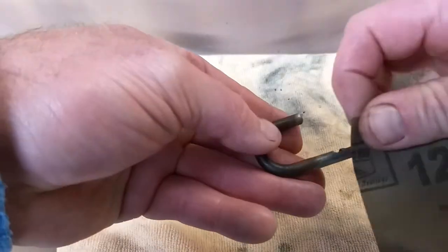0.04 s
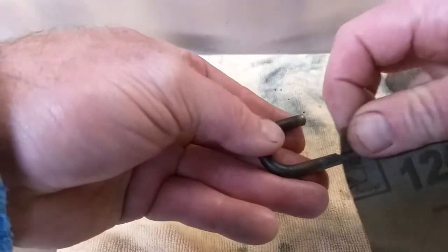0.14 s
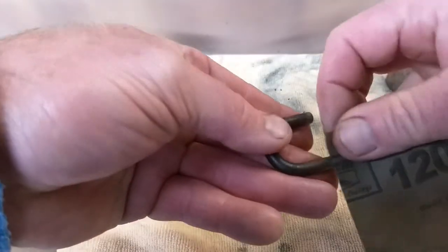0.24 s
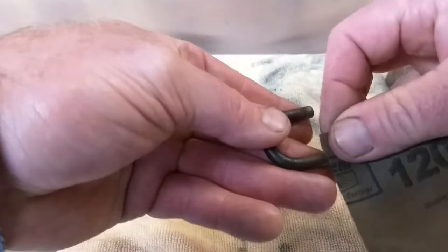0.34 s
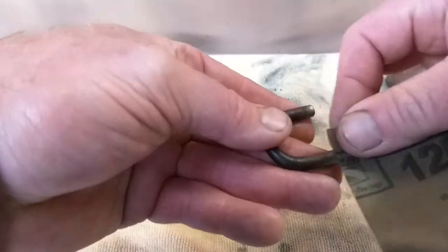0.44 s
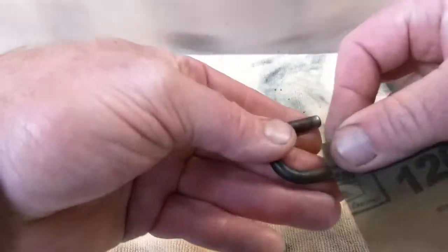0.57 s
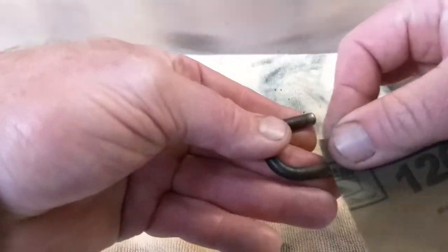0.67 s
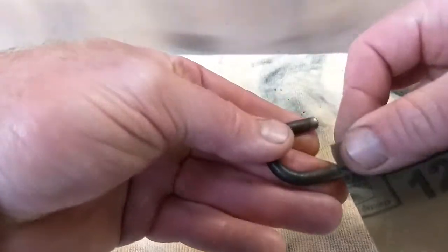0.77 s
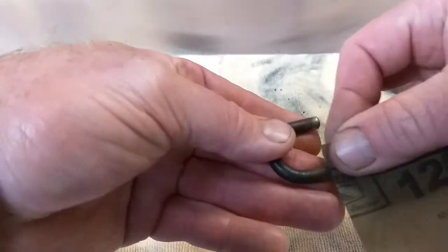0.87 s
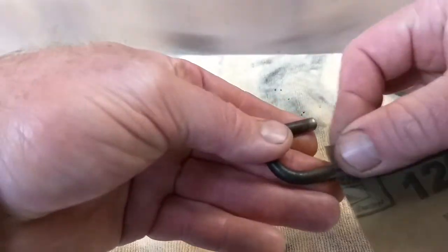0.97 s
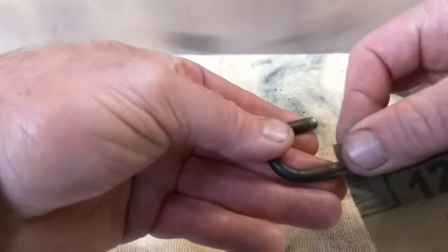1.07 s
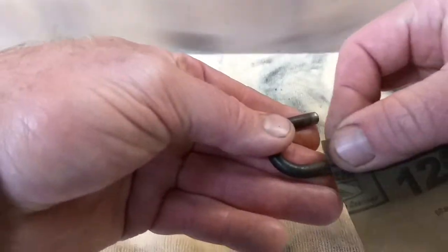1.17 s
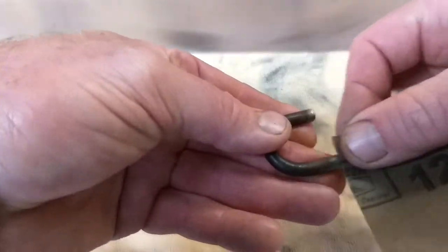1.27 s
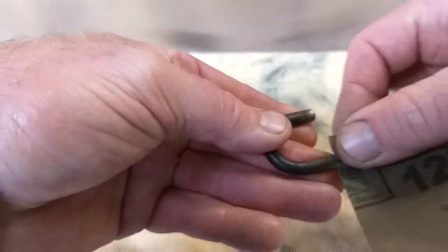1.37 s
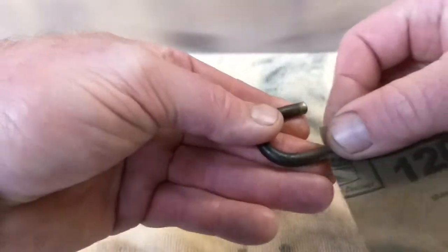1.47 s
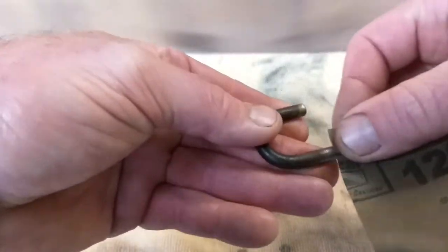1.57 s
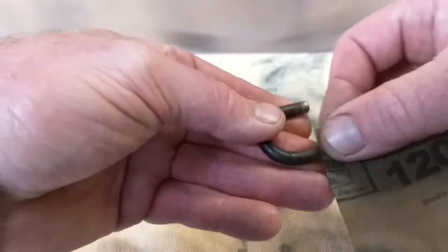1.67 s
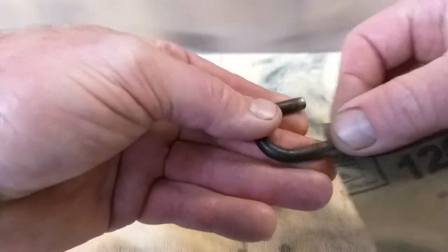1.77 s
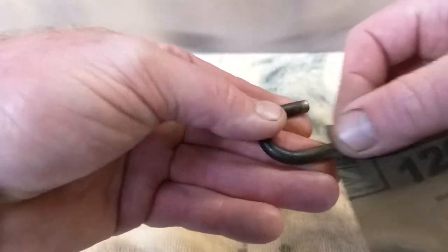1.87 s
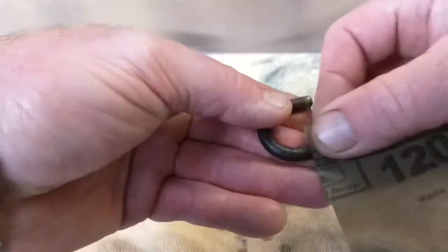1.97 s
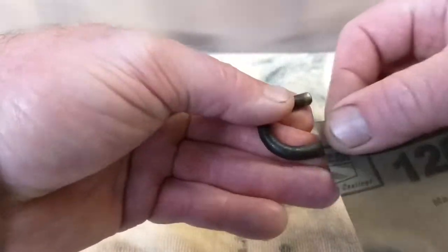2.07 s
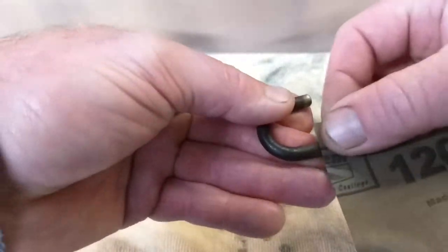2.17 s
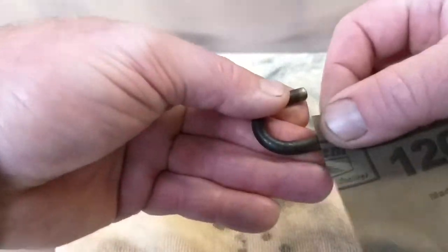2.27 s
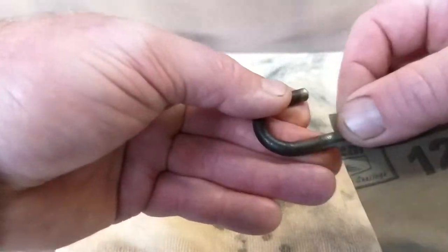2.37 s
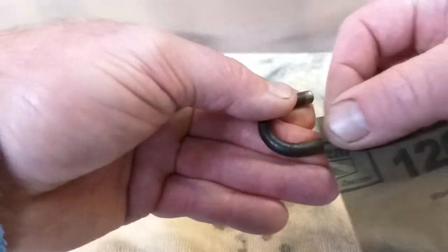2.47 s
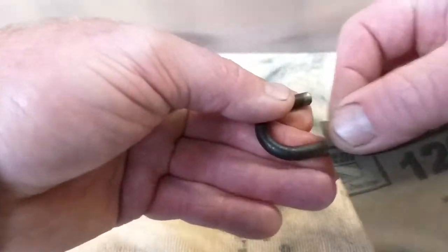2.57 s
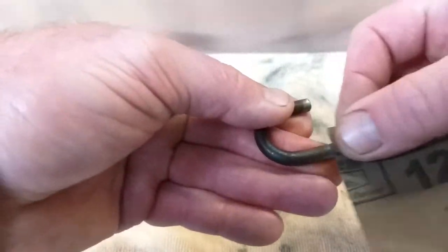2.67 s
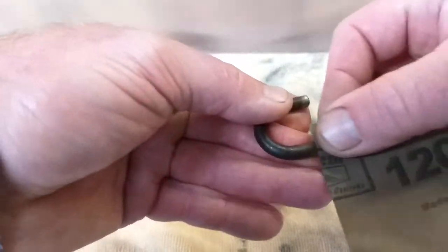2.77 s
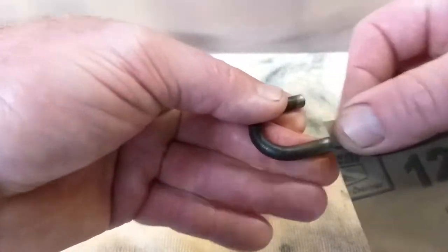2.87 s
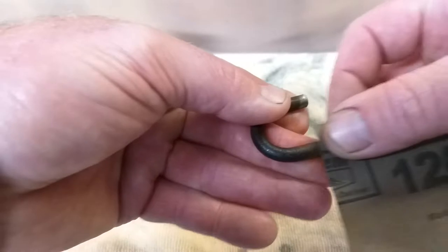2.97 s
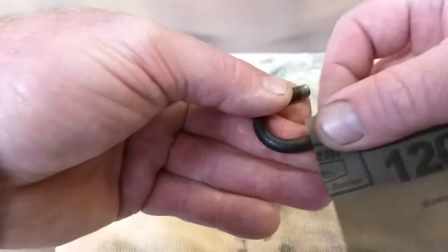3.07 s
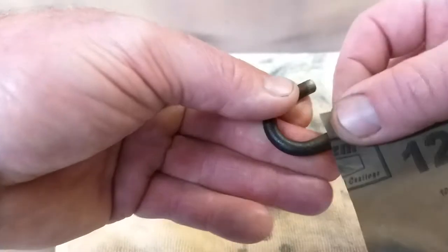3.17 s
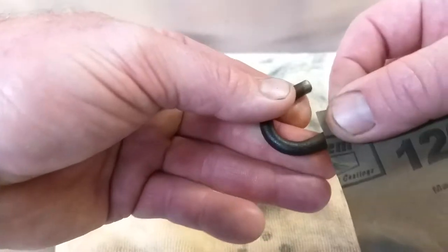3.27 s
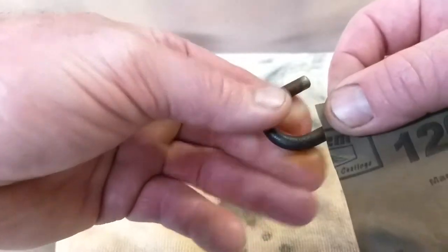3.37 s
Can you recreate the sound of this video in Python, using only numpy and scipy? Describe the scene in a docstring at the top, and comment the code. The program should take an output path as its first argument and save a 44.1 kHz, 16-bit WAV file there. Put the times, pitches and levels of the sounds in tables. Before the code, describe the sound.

Sandpaper rubbed quickly back and forth over a small steel part by hand.

```python
"""In a workshop, close to a phone, abrasive paper is rubbed back and forth over a small steel shackle.
Grit clicks densely on the steel, growing quieter and duller at each turn; the grip colours
every stroke. A quick cluster of dull knocks rings the bench at the start, and paper ticks and light
drags fill the pauses. Underneath lie a short room tail and a faint workshop hum."""
import sys
import numpy as np
from scipy import signal
from scipy.fft import rfft, irfft
from scipy.io import wavfile
from scipy.ndimage import uniform_filter1d

SR = 44100
rng = np.random.default_rng(int(sys.argv[2]) if len(sys.argv) > 2 else 0)


def dump(signal):
    """Clip the signal to [-1, 1] and save it as 16-bit WAV at the path in sys.argv[1]."""
    limited = np.clip(np.atleast_2d(signal).T, -1, 1)
    pcm = np.round(limited * 32767).astype(np.int16)
    wavfile.write(sys.argv[1], SR, pcm)


N = 152145

# Strokes and light drags; the second row is the low, dull tail of the opening knocks.
# Each row: start and end in seconds, place of the crest from 0 to 1, dip at the start and at the end
# (in dB once scaled by BODY_DIP or TREBLE_DIP), level at the crest in dB, then a gain in dB for each
# grip band, low to high.
STROKES = [(0.0, 0.01, 0.48, 0.0, 2, -39, 23, -10, 15.5, 7, 4, -1, 15),
           (0.017, 0.093, 0.1, 7, -3, -65, 35, 11, 12.5, -3, -10, -6, -11),
           (0.207, 0.289, 0.83, 8, 23, -29, 2.5, 6, 1.5, -2.5, -5, 1, -6),
           (0.309, 0.36, 0.57, 24, 22.0, -27, 9.5, 2, 6, 5.5, 0, -1.5, 3),
           (0.375, 0.468, 0.5, 25, 31, -31, 5.5, 3.5, 3, -1.5, -5, -1, -5.5),
           (0.489, 0.618, 0.57, 23.5, 2.5, -27, 0.5, 1.5, 2.5, -2, -5, 1, -4),
           (0.632, 0.755, 0.63, 36, 14, -26, -1, 7, 3, -3, -6, -3, -7),
           (0.771, 0.818, 0.99, 11, 0.0, -49, 5, 1, 4, 4, -1, 1, -10),
           (0.809, 0.906, 0.29, 22, 8.5, -26.5, 0.5, 1.5, 7.5, -1, 0.5, 1.5, 1.5),
           (0.934, 1.044, 0.41, 34, 5.5, -25, 0.5, 1.5, 2, -1, -2, -2.5, -2.5),
           (1.076, 1.182, 0.34, 37, 7.5, -26, -3, 0, 2, -2, -2, -0.5, -1),
           (1.207, 1.313, 0.51, 20, 7, -25.5, -3, -2, 0, 0, 0.5, -4, -2),
           (1.34, 1.429, 0.31, 37, 8, -28, -4, -1.5, 1.5, -1.5, 3, -1.5, -0.5),
           (1.444, 1.563, 0.75, 31.5, 20, -26, 2, -5.5, 3, -1, 1.5, -3.5, -0.5),
           (1.588, 1.699, 0.28, 27, 8, -25, -5.5, 1.5, -1, 0, 0.5, -3.5, -1),
           (1.721, 1.832, 0.65, 24.5, 14, -25, 0.5, -1.5, 0.5, -1.5, 0.5, -5, -2.5),
           (1.854, 1.963, 0.19, 32, 7, -22, -2.5, -1.5, 0, -1, -0.5, -1.5, 1),
           (1.985, 2.088, 0.51, 26, 16, -29, 9, 4.5, 5.5, 1, 1, -2.5, -0.5),
           (2.086, 2.147, 0.71, 14, 13, -57, 19, 1, 1, -2, 3, -15, -9),
           (2.152, 2.199, 0.089, -6, 17, -60.5, 4, 5, 6, 0, 3, -4, -3),
           (2.263, 2.375, 0.5, 16, 4.5, -30, 8, 2.5, 5, -0.5, -2, -5.5, -2),
           (2.403, 2.516, 0.22, 26.0, 6.5, -26, -0.5, 1, 1.5, -2, -1.5, -1, -4.5),
           (2.541, 2.64, 0.34, 26.5, 3, -26, 6, 3, 6, -0.5, -1, -3.5, -1.5),
           (2.664, 2.775, 0.22, 28, 8.5, -26, -1.5, 3.5, 3.5, -0.5, -0.5, -2.5, -0.5),
           (2.793, 2.911, 0.58, 24.5, 6, -26.5, 3.5, 7, 0, -0.5, -7.5, -5, -7.5),
           (2.933, 3.046, 0.22, 22, 8.5, -27, 10, 0.5, 9, 1.5, -3, 3, 0),
           (3.064, 3.144, 0.78, 26, 11, -37, 7, 4.5, 6, -2.5, -3, -4.5, -9.5),
           (3.142, 3.214, 0.76, 14.5, 15.0, -35.5, 9, 3, 4, 6, 0.5, 3, 0.5),
           (3.222, 3.273, 0.55, 5, 8.0, -67, 9, -3, 1, 0, -6, -1, -5),
           (3.287, 3.331, 0.81, 16, 15, -44.5, 13, -2, -1.5, 3.5, -1, 6, 2),
           (3.342, 3.349, 0.41, 6.0, 11.0, -48, 5, -4, 7, 2, 9, 11, 3),
           (3.349, 3.376, 0.51, -1, 11.0, -57.5, 5, 1, 2, -1, 7, 8, 1),
           (3.38, 3.422, 0.1, 5, 17, -65, 5, 7, -2, -2, 10, -3, 3),
           (3.433, 3.52, 0.27, 18, 6.0, -29.5, -1, 7.5, -4, -3, 1, 3.5, -5)]
# Resonances of paper and steel that the grip frees or damps. Each row: centre in Hz, width in octaves.
GRIP_BANDS = [(550, 0.83), (1100, 0.41), (2400, 0.62), (4500, 0.27), (5800, 0.057), (7400, 0.13),
              (14000, 0.6)]
# The tone of grit on steel. Each row: frequency in Hz, gain in dB.
GRIT_EQ = [(150, -53.5), (250, -38.5), (399, -34), (564, -30), (855, -31), (949, -29), (1090, -26),
           (1190, -21.5), (1440, -19.5), (1960, -12), (2500, -15), (2980, -7.5), (3480, -12.5),
           (4070, -2.5), (4510, 0.5), (5090, -1.5), (5750, 2), (7080, -0.5), (7720, 2.5), (9180, 3),
           (10500, -2.5), (11300, -3), (15700, -12)]
# Resonances that every grit click excites. Each row: centre in Hz, width in Hz, boost in dB.
STEEL_RINGS = [(2020, 346, 2), (2910, 370, 0.5), (5750, 250, 2.5), (8840, 1500, 0.3)]
# Paper ticks. Each row: start in seconds, peak level in dB before the band-pass.
PAPER_TICKS = [(0.206, -20), (0.6379, -28), (0.7831, -35), (0.9374, -25), (1.728, -28), (1.7385, -24),
               (2.132, -28), (2.156, -38), (2.2464, -63), (2.2538, -59), (2.2913, -17), (2.3424, -11),
               (3.2174, -29), (3.297, -32), (3.3633, -39), (3.37, -33), (3.3767, -44)]
# Knocks on the bench. Each row: start in seconds, peak level in dB, brightness in dB per octave.
BENCH_KNOCKS = [(0.0119, -20.5, 4.5), (0.0232, -23.5, 3.7), (0.028, -25, -2), (0.07, -45.5, -6),
                (0.141, -60, -6), (0.2047, -48.5, -3.5), (3.144, -42, 0.5)]
# Modes of the bench. Each row: pitch in Hz, relative level in dB, seconds to fade by 60 dB.
BENCH_MODES = [(260, 8, 0.022), (356, -0.5, 0.026), (456, -1, 0.027), (710, 7, 0.015), (1170, 2, 0.0096),
               (1410, 2.5, 0.0063), (2010, 2, 0.016), (2750, -10, 0.0094), (3800, -3, 0.0044)]
# Workshop hum. Each row: pitch in Hz, RMS level in dB, width in Hz.
HUM_BANDS = [(53, -89, 7.2), (108, -74, 9.8)]
# The tone of the workshop air. Each row: frequency in Hz, gain in dB.
AIR_EQ = [(20, -36), (45, -6.5), (140, -10), (320, -22), (400, -23), (800, -24), (1400, -30), (4500, -27),
          (8500, -35), (15500, -43)]
# Bands where the two microphone ports differ, leaning left then right.
# Each row: centre in Hz, width in Hz, side gain in dB, phase shift in radians.
PORT_BANDS = [(1920, 320, -13.5, 0.84), (9630, 920, -11.5, .9)]

GRAINS_PER_S, GRAIN_SPREAD_DB, GRAIN_CAP_DB = 15000, 3, 6.5
FLUTTER_DB, FLUTTER_PER_S = 0.94, 160
RISE_POWER, FALL_POWER, CATCH_S, STOP_S = 2.93, 4.14, 0.0016, 0.0036
CROSSOVER_HZ, BODY_DIP, TREBLE_DIP = 7000, 0.98, 2.22  # slow parts of a stroke lose more treble
CREEP_DB, CREEP_S = -43, 0.028
TICK_T60_S, TICK_LOW_HZ, TICK_HIGH_HZ = 0.0043, 4000, 15000
CONTACT_S = 0.00022
ROOM_DB, ROOM_T60_S = -17.5, 0.13
AIR_DB, AMBIENCE_SIDE_DB = -71, -29
MIC_HISS_DB, MIC_HISS_HZ, LOW_CUT_HZ, HIGH_CUT_HZ = -77.5, 4000, 48, 15920


def sanding():
    """Thousands of uneven grit clicks a second excite the steel and paper, shaped stroke by stroke."""
    hits = rng.random(N) < GRAINS_PER_S / SR
    polarity = np.sign(rng.random(N) - .5)
    size_db = np.minimum(rng.exponential(GRAIN_SPREAD_DB, N), GRAIN_CAP_DB)
    clicks = hits * polarity * undb(size_db + FLUTTER_DB * walk(FLUTTER_PER_S))
    ring = sum((undb(db) - 1) * peak(clicks, hz, width) for hz, width, db in STEEL_RINGS)
    grit = colour(clicks + ring, GRIT_EQ)
    return sum(stroke(grit, *row) for row in STROKES)


def stroke(grit, start, end, crest, start_dip, end_dip, level_db, *grip_db):
    """One stroke: the grit catches, swells, slows and stops short; the paper creeps around it."""
    i, j = max(int((start - 5 * CREEP_S) * SR), 0), min(int((end + 5 * CREEP_S) * SR), N)
    t, f = np.arange(i, j) / SR, np.fft.rfftfreq(j - i, 1 / SR) + 1
    grip_eq = sum(db * np.exp(-.5 * (np.log2(f / hz) / octaves) ** 2)
                  for db, (hz, octaves) in zip(grip_db, GRIP_BANDS))
    rasp = unit(irfft(rfft(grit[i:j]) * undb(grip_eq), j - i))
    body = irfft(rfft(rasp) / (1 + (f / CROSSOVER_HZ) ** 2), j - i)
    travel = np.clip((t - start) / (end - start), 0, 1)
    crest = np.clip(crest, .05, .95)
    dip = start_dip * np.clip(1 - travel / crest, 0, 1) ** RISE_POWER
    dip += end_dip * np.clip((travel - crest) / (1 - crest), 0, 1) ** FALL_POWER
    swell = body * undb(-BODY_DIP * dip) + (rasp - body) * undb(-TREBLE_DIP * dip)
    gate = np.clip(np.minimum((t - start) / CATCH_S, (end - t) / STOP_S) + .5, 0, 1)
    outside_s = np.maximum(np.maximum(start - t, t - end), 0)
    creep = undb(CREEP_DB) * np.exp(-outside_s / CREEP_S)
    out = np.zeros(N)
    out[i:j] = undb(level_db) * (gate * swell + creep * rasp)
    return out


def paper_ticks():
    """The stiff paper crackles in single, very short, bright bursts."""
    out, t = np.zeros(N + SR), np.arange(SR // 20) / SR
    for start, db in PAPER_TICKS:
        burst = rng.standard_normal(len(t)) * 1000 ** (-t / TICK_T60_S)
        i = int(start * SR)
        out[i:i + len(t)] += undb(db) * burst / np.abs(burst).max()
    band = signal.butter(2, [TICK_LOW_HZ, TICK_HIGH_HZ], "band", fs=SR, output="sos")
    return signal.sosfilt(band, out[:N])


def bench_knocks():
    """Dull knocks ring the bench briefly; the contact takes a moment, which rounds the attack."""
    out, t = np.zeros(N + SR), np.arange(SR // 5) / SR
    attack = 1 - np.exp(-t / CONTACT_S)
    for start, db, tilt in BENCH_KNOCKS:
        ring = np.zeros(len(t))
        for k, (hz, mode_db, t60) in enumerate(BENCH_MODES):
            gain = (-1) ** k * undb(mode_db + tilt * np.log2(hz / 700))
            ring += gain * attack * np.sin(2 * np.pi * hz * t) * 1000 ** (-t / t60)
        i = int(start * SR)
        out[i:i + len(t)] += undb(db) * ring / np.abs(ring).max()
    return out[:N]


def room_tail(near):
    """The room answers the close sounds with a weak, short reverb."""
    t = np.arange(SR // 2) / SR
    tail = rng.standard_normal(len(t)) * 1000 ** (-t / ROOM_T60_S)
    return undb(ROOM_DB) * signal.fftconvolve(near, tail / np.linalg.norm(tail))[:N]


def ambience():
    """A bed of faint, broad hiss and wavering low hum."""
    air = undb(AIR_DB) * unit(colour(rng.standard_normal(N), AIR_EQ))
    hum = sum(undb(db) * unit(peak(peak(rng.standard_normal(N), hz, width), hz, 3 * width))
              for hz, db, width in HUM_BANDS)
    return air + hum


def port_mismatch(mid):
    """The two microphone ports differ in two narrow bands, adding stereo width."""
    side = np.zeros(N)
    for k, (hz, width, db, phase) in enumerate(PORT_BANDS):
        band = signal.filtfilt(*signal.iirpeak(hz, hz / width, fs=SR), mid)
        side += (-1) ** k * undb(db) * np.real(np.exp(1j * phase) * signal.hilbert(band))
    return side


def undb(db):
    return 10 ** (np.asarray(db, float) / 20)


def unit(x):
    return x / np.sqrt(np.mean(x ** 2))


def colour(x, table):
    """EQ by a curve of Hz and dB points."""
    hz, db = np.array(table).T
    f = np.fft.rfftfreq(len(x), 1 / SR) + 1
    return irfft(rfft(x) * undb(np.interp(np.log(f), np.log(hz + 1), db)), len(x))


def peak(x, hz, width):
    """Resonant band-pass, gain 1 at the centre."""
    return signal.lfilter(*signal.iirpeak(hz, hz / width, fs=SR), x)


def walk(rate):
    """Smooth random wander, spread 1."""
    k = int(SR / rate)
    return unit(uniform_filter1d(np.repeat(rng.standard_normal(N // k + 1), k), k)[:N])


def scene():
    """The handwork sits up front, with the room and its hum behind."""
    near = sanding() + paper_ticks() + bench_knocks()
    mid = near + room_tail(near) + ambience()
    side = port_mismatch(mid) + undb(AMBIENCE_SIDE_DB) * ambience()
    return np.array([mid + side, mid - side])


def record(dry):
    """The phone adds a faint hiss and cuts the deepest bass and the very top."""
    hiss = signal.lfilter(*signal.butter(1, MIC_HISS_HZ, "high", fs=SR), rng.standard_normal(N))
    low_cut = signal.butter(3, LOW_CUT_HZ, "high", fs=SR, output="sos")
    high_cut = signal.ellip(10, .2, 75, HIGH_CUT_HZ, fs=SR, output="sos")
    thinned = signal.sosfilt(low_cut, dry + undb(MIC_HISS_DB) * hiss)
    return signal.sosfilt(high_cut, thinned)


dry = scene()
out = record(dry)
dump(out)
```